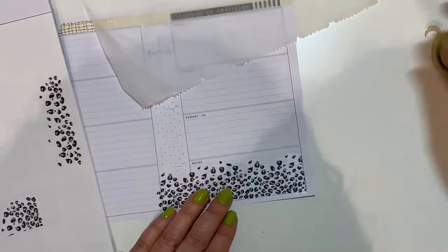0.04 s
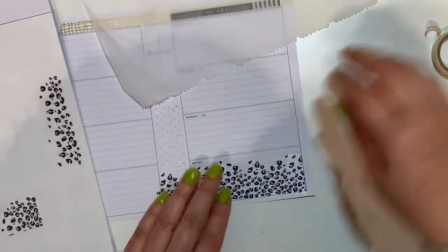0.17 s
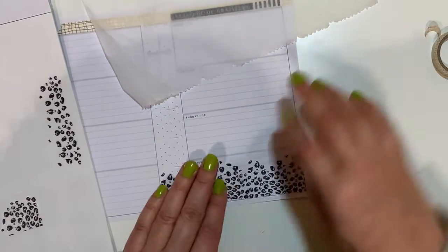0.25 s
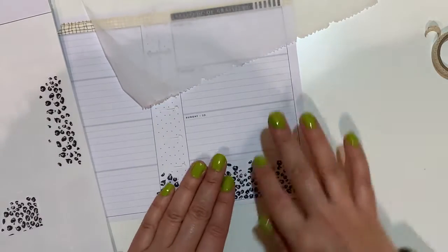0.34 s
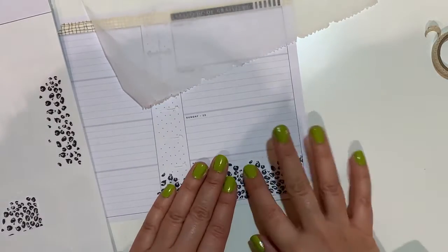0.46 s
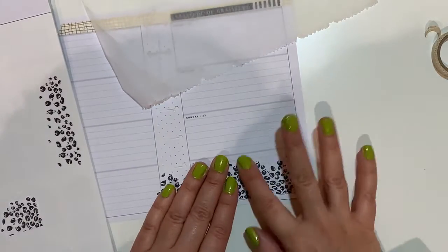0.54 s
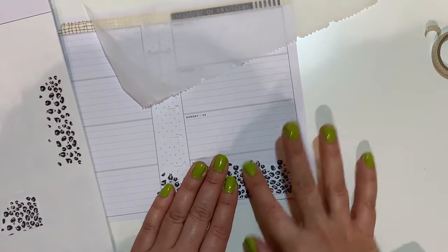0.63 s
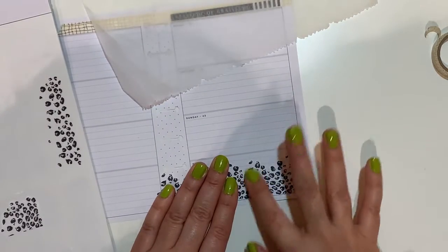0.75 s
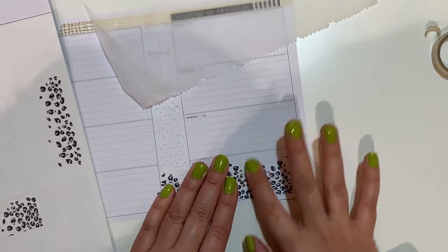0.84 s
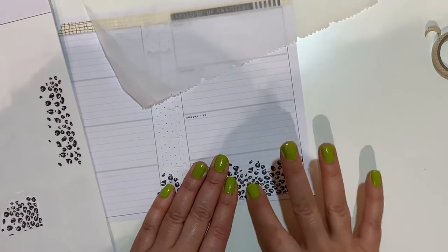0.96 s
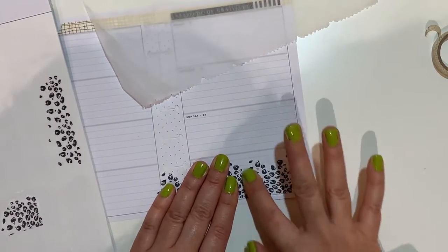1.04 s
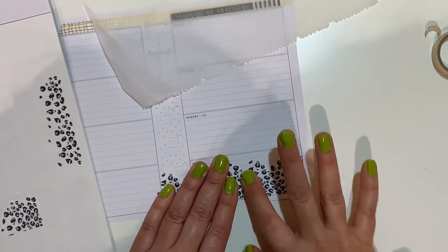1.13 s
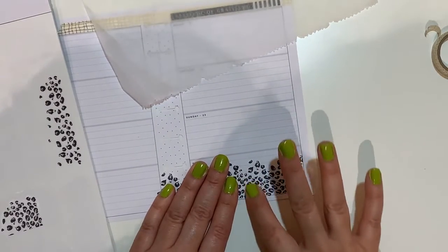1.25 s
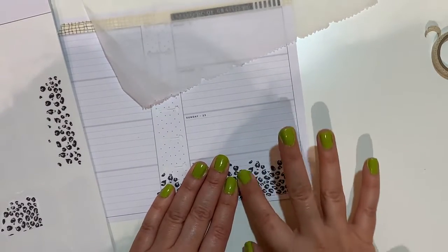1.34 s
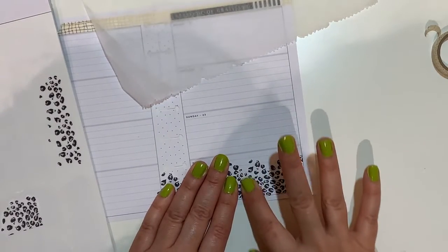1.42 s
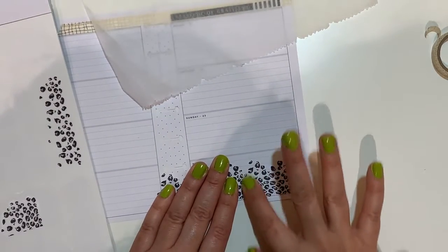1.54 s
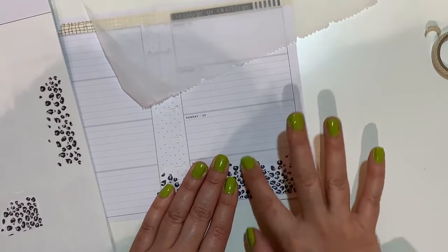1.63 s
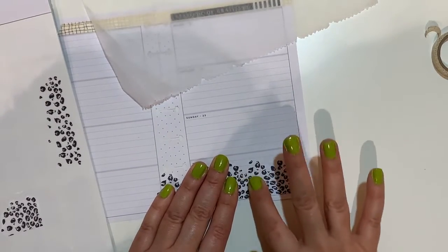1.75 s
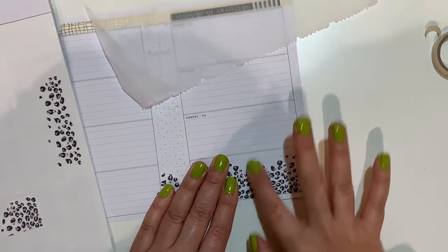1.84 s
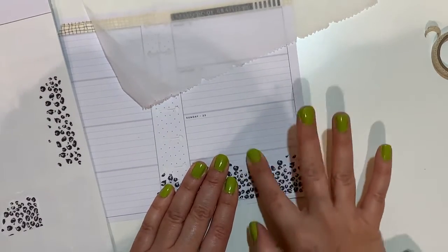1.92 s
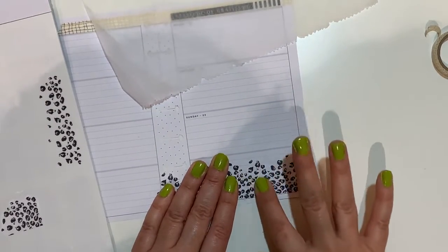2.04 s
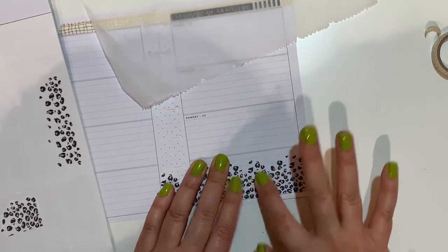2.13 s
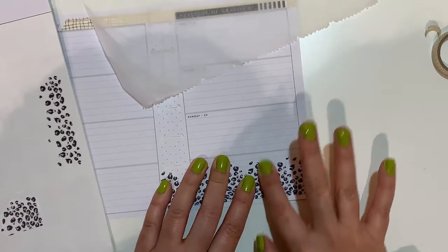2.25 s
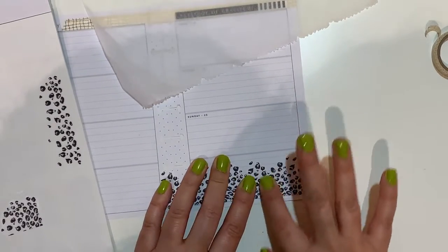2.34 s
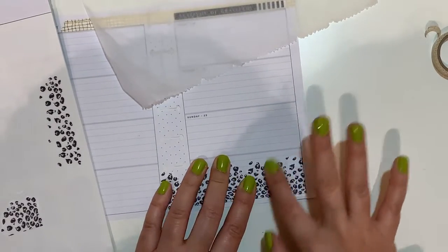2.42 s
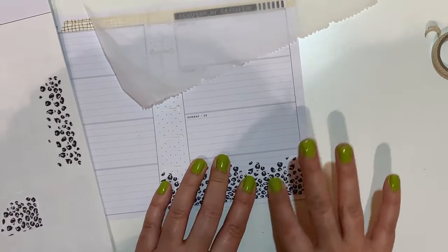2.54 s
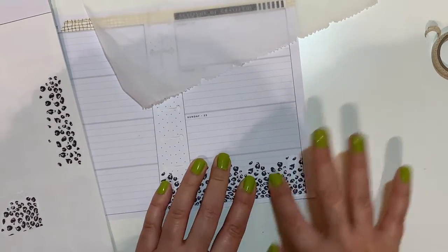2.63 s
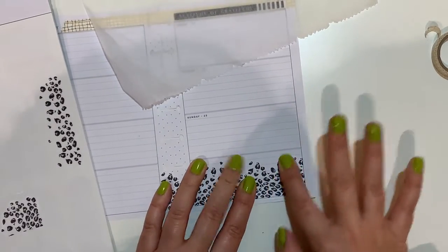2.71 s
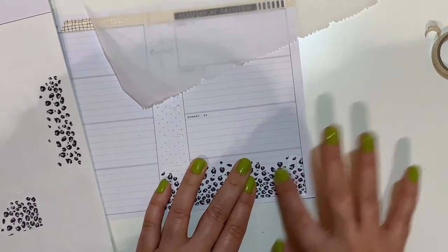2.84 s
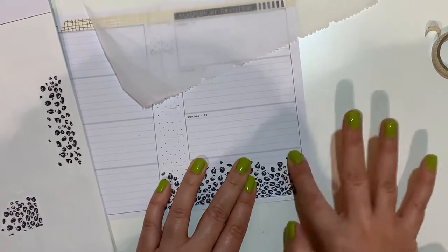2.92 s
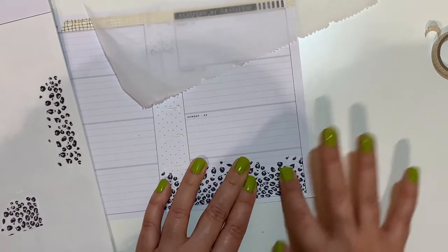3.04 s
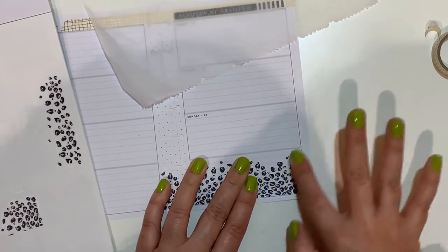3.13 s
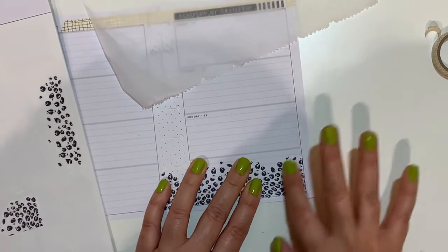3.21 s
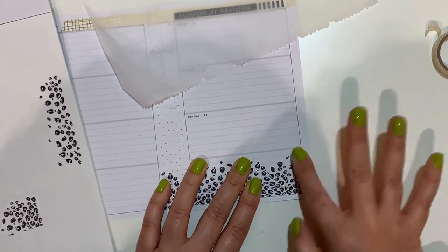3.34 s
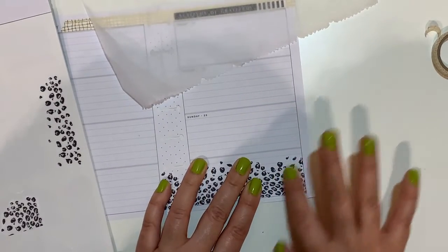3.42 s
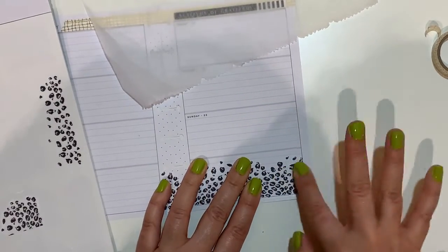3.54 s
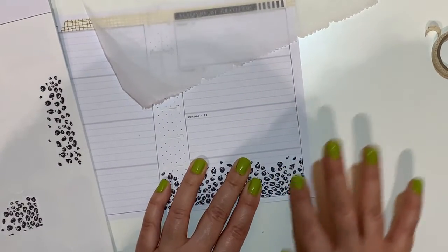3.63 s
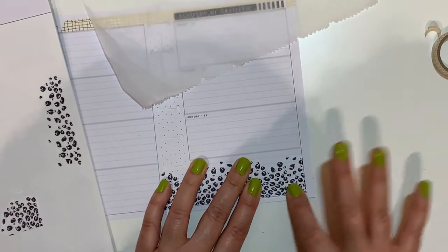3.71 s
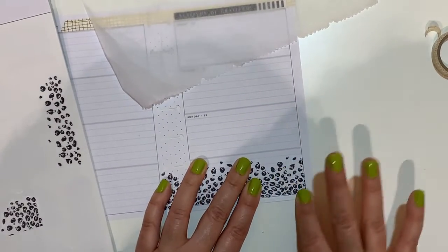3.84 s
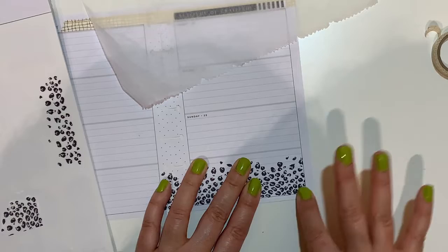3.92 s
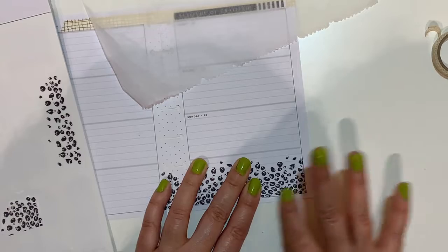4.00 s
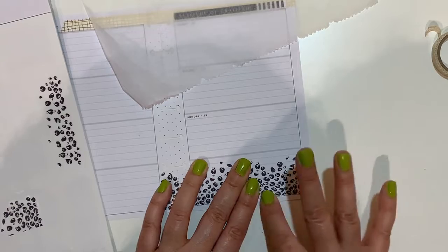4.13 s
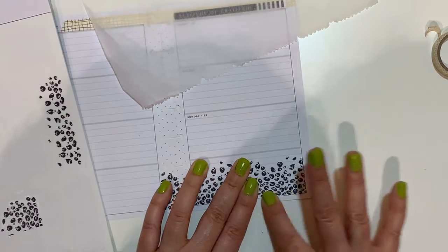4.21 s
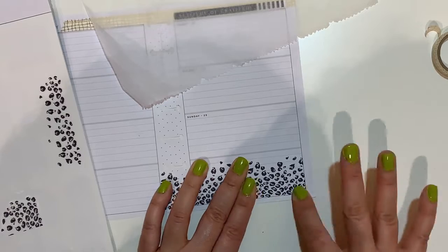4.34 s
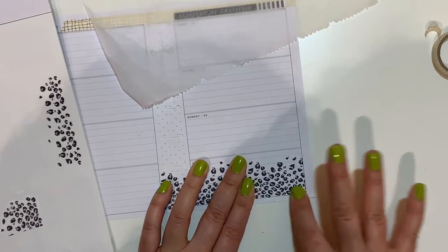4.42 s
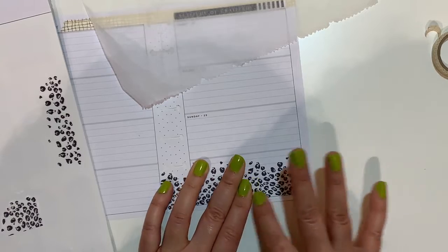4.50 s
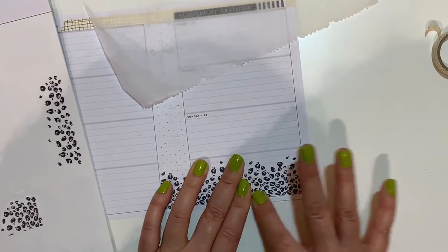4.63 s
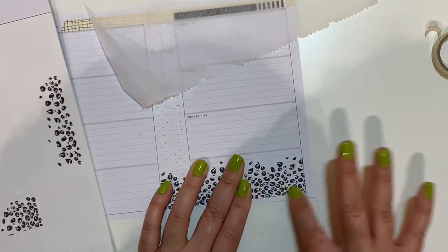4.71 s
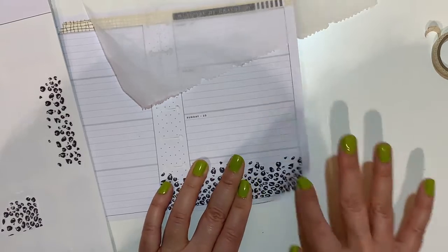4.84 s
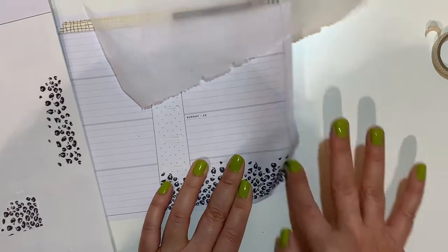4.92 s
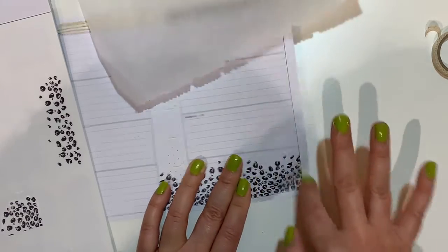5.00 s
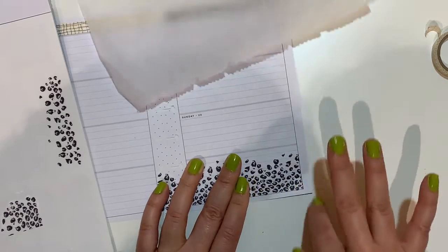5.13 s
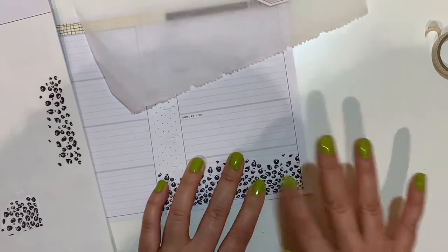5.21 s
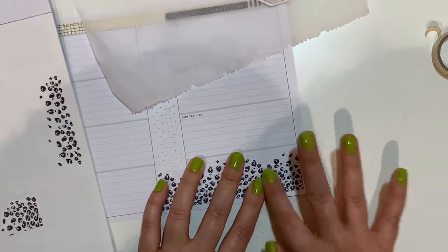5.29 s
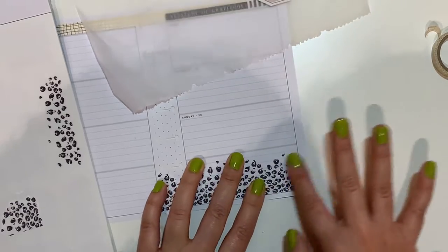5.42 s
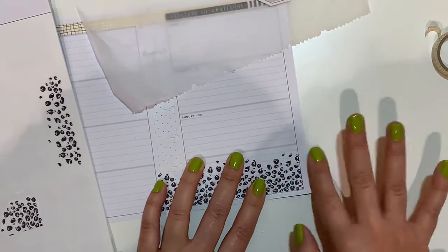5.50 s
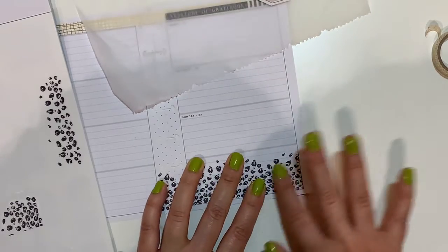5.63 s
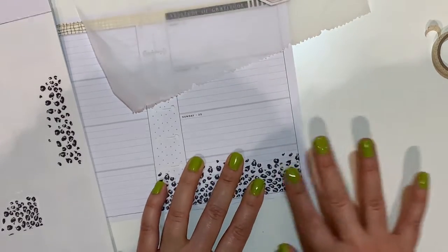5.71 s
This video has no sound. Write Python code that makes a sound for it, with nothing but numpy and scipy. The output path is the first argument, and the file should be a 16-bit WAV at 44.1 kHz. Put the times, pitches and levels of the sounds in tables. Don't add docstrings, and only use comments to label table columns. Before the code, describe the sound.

Fingertips rub a paper sticker flat on a page with quick soft papery strokes and dull desk thuds, then a sharp crackling corner flick and heavy slaps.

```python
import sys
import numpy as np
from scipy import signal
from scipy.fft import rfft, irfft
from scipy.io import wavfile

SR = 44100
rng = np.random.default_rng(int(sys.argv[2]) if len(sys.argv) > 2 else 0)


def log_audio(samples):
    frames = np.atleast_2d(samples).T
    limited = np.clip(frames, -1, 1)
    pcm = np.round(limited * 32767).astype(np.int16)
    wavfile.write(sys.argv[1], SR, pcm)


def invert_db(level):
    return 10 ** (np.asarray(level, dtype=float) / 20)


N = 253971

# (start [s], length [s], skin hiss [dB])
RUBS = [(0.504, 0.081, -68.5), (0.609, 0.089, -61.5), (0.743, 0.088, -63), (0.845, 0.11, -63),
        (1.01, 0.073, -69.5), (1.127, 0.097, -68), (1.276, 0.086, -69.5), (1.408, 0.079, -67.5),
        (1.542, 0.1, -65), (1.683, 0.095, -66), (1.826, 0.096, -65.5), (1.968, 0.11, -63),
        (2.126, 0.088, -64), (2.239, 0.094, -61.5), (2.388, 0.08, -65), (2.496, 0.089, -65),
        (2.627, 0.099, -65.5), (2.74, 0.084, -65), (2.862, 0.075, -65.5), (2.972, 0.075, -65),
        (3.089, 0.095, -67), (3.203, 0.052, -65.5), (3.309, 0.057, -67.5), (3.392, 0.085, -64),
        (3.522, 0.05, -66), (3.596, 0.094, -66)]
# (start [s], length [s], skin hiss [dB], paper rustle [dB])
SWEEPS = [(0.162, 0.021, -79, -76), (0.35, 0.067, -87, -75.5), (0.395, 0.04, -77, -75.5),
          (0.41, 0.2, -82.5, -72), (3.743, 0.049, -68.5, -72.5), (3.822, 0.074, -76.5, -73.5),
          (4.007, 0.097, -65.5, -74), (4.259, 0.1, -66, -69.5), (4.452, 0.11, -64.5, -75.5),
          (4.643, 0.16, -65.5, -70), (5.18, 0.067, -76, -78), (5.248, 0.011, -65.5, -70),
          (5.297, 0.034, -66.5, -70.5), (5.362, 0.13, -61.5, -76.5), (5.457, 0.1, -72, -73),
          (5.632, 0.069, -80, -77.5), (5.696, 0.12, -63, -72)]
# (start [s], length [s], dull drag [dB], grit [dB])
DRAGS = [(0.174, 0.12, -53, -55), (0.589, 0.092, -61.5, -59), (0.677, 0.15, -53.5, -62.5),
         (1.095, 0.12, -53, -55), (1.659, 0.11, -54, -54), (1.755, 0.15, -58.5, -80),
         (1.973, 0.047, -56, -52.5), (2.193, 0.11, -57, -50.5), (2.243, 0.063, -56, -53.5),
         (2.504, 0.098, -69.5, -77), (2.7, 0.087, -60, -87), (2.851, 0.16, -58.5, -57),
         (3.117, 0.096, -74, -60), (3.394, 0.023, -57.5, -55.5), (3.948, 0.065, -69.5, -76),
         (4.011, 0.02, -61, -89), (4.305, 0.023, -62, -88), (4.367, 0.15, -79, -93),
         (4.556, 0.062, -64.5, -67), (4.95, 0.097, -62, -44), (5.098, 0.089, -56.5, -85),
         (5.244, 0.072, -60, -82), (5.434, 0.088, -81, -56.5), (5.613, 0.092, -51, -68)]
# (frequency [Hz], density [dB per Hz])
HISS = [(4500, -10), (6000, -5.5), (7100, -2), (7700, -3), (8500, 3), (10300, 2.5), (11800, 6),
        (13500, 0.5), (15900, 2)]
# (frequency [Hz], density [dB per Hz])
RIDGE_PEAK = [(10000, -20), (11200, -14.5), (12200, -11), (13600, -14)]
# (frequency [Hz], density [dB per Hz])
RUSTLE = [(700, -13), (1000, -7), (1250, -10), (1500, -6), (1900, -10), (2400, -3), (2900, 0), (3450, -9),
          (3900, -3), (4600, -5), (5100, -12), (5550, -9), (6300, -15), (8000, -20)]
# (frequency [Hz], density [dB per Hz])
SHEET = [(1200, -20), (1500, 5.5), (1900, -22), (2400, 2), (2950, 3.5), (3500, -3.5), (4000, 1),
         (4700, -16), (5600, -3.5)]
# (frequency [Hz], density [dB per Hz])
DRAG_COLOUR = [(150, 5), (230, 9), (340, 6.5), (480, 9.5), (650, 1.5), (800, -8), (980, -3), (1300, -8.5)]
# (frequency [Hz], density [dB per Hz])
GRIT = [(900, -17), (1300, -29), (2000, -18), (2600, -18), (3500, -17.5), (4300, -27), (4900, -25.5),
        (6000, -34)]
# (time [s], paper [dB], skin hiss [dB])
FLICK = [
    (4.82, -88, -110),
    (4.862, -54, -46),
    (4.928, -44, -45),
    (4.99, -42.5, -56.5),
    (5.016, -53.5, -44),
    (5.048, -54, -54),
    (5.085, -66.5, -98),
    (5.24, -85, -89),
    (5.27, -80, -87),
]
# (frequency [Hz], density [dB per Hz])
FLICK_COLOUR = [(300, -44), (450, -0.5), (780, -1), (970, 3.5), (1350, -11), (1940, 10.5), (2330, 8.5),
                (4000, 4.5), (7000, -5), (10000, -5)]
# (time [s], thud [dB], knock [dB])
LANDINGS = [(1.008, -41.5, -51.5), (1.274, -38, -42.5), (1.535, -38.5, -42.5), (1.82, -38, -43),
            (2.125, -38, -43.5), (2.391, -42, -48), (2.623, -41, -46), (2.861, -40, -53), (3.085, -42, -47),
            (3.3, -47.5, -53), (3.518, -46, -55.5), (3.744, -46, -57.5), (3.989, -42, -42)]
LANDING_PHASES = (0.3, 2.5, 5.0)
# (time [s], peak [dB], pitch [Hz])
TURNS = [(0.725, -50, 83), (0.76, -43.5, 99), (0.854, -52, 107), (0.88, -45.5, 88), (1.115, -46.5, 92),
         (1.159, -46.5, 88), (1.176, -49.5, 90), (1.384, -51, 86), (1.421, -48.5, 94), (1.671, -46.5, 93),
         (1.712, -45.5, 95.6), (1.763, -56, 108), (1.939, -45.5, 97), (1.985, -47, 88), (2.008, -52, 68.6),
         (2.232, -41, 88), (2.257, -52, 88), (2.306, -49, 103), (2.486, -49, 85), (2.509, -53.5, 78.5),
         (2.538, -56, 70), (2.722, -48.5, 81), (2.764, -53, 101), (2.99, -49.5, 103), (3.127, -49, 81),
         (3.163, -49, 88), (3.219, -57, 91), (3.418, -55.5, 104.5)]
# (time [s], peak [dB], pitch [Hz])
LEANS = [(0.216, -62, 78.5), (0.422, -43, 89.3), (0.457, -57.5, 66.6), (0.492, -60, 74), (0.648, -59, 85.5),
         (3.715, -53.5, 75), (3.909, -52, 94), (4.161, -59, 89), (4.275, -50.5, 91), (4.32, -53, 93),
         (4.404, -53, 98), (1.499, -73, 216), (1.6, -68.5, 242), (1.641, -65, 257), (2.601, -68, 198),
         (2.669, -66, 220), (4.43, -65.5, 219), (4.467, -56, 91), (4.556, -53, 84), (4.587, -55.5, 60.5),
         (4.658, -50, 96), (4.855, -51.5, 98.4), (5.004, -47.5, 93), (5.06, -55.5, 97), (5.129, -63, 114),
         (5.164, -57, 91), (5.243, -49, 91), (5.27, -33.5, 100), (5.318, -32, 96.4), (5.379, -57, 108),
         (5.662, -26.5, 100.3), (5.715, -40.5, 85.5)]
# (frequency [Hz], level [dB], t60 [s])
HUM_MODES = [(650, -2.5, 0.032), (926, -5, 0.048), (1000, -3.5, 0.026), (1260, -5.5, 0.012),
             (1500, -11.5, 0.01)]
# (time [s], peak [dB], brightness [dB])
TAPS = [(0.171, -64, 8), (0.184, -52, -18), (0.202, -50, -9), (0.234, -51.5, -7), (0.614, -54, 4),
        (0.622, -52, 1), (0.827, -52.5, 0), (1.031, -58, -6), (1.096, -54.5, -10), (1.107, -54.5, 5.5),
        (1.206, -54, -10), (1.375, -59, -4.5), (1.433, -60.5, 2.5), (1.593, -68, 10), (1.668, -68, 12),
        (1.899, -57.5, 4), (1.97, -62, 4), (1.981, -51.5, -5), (2.203, -56.5, 8), (2.254, -60, 2),
        (2.502, -65, 6), (2.511, -55.5, 2), (3.387, -71, -3), (3.399, -58, -12), (4.306, -63, -19),
        (4.46, -64.5, -3), (3.927, -59, -6), (4.11, -68.5, 6.5), (3.109, -66, -3), (2.213, -64, 4),
        (4.563, -61, -6.5), (4.844, -61, -22), (5.2569, -52, -19), (5.293, -52, -26), (5.612, -63.5, 3),
        (5.687, -48.5, -8)]
# (frequency [Hz], level [dB], t60 [s])
TOP_MODES = [(198.6, 3.5, 0.066), (316, -9, 0.11), (405, -8, 0.069), (588, -4, 0.016), (630, -1, 0.047),
             (716, -7, 0.033), (957, 1, 0.035), (1059, -8, 0.047), (1220, -57, 0.18), (1504, 1.5, 0.0089)]
# (frequency [Hz], level [dB], t60 [s])
BRIGHT_MODES = [(1830, -3, 0.012), (2260, 2.5, 0.0045), (2470, 4, 0.0044), (3770, -17, 0.019)]
# (time [s], slip rate [slips per s])
CHATTER = [
    (2.8108, 172),
    (2.83, 160),
    (2.852, 138),
]
# (level [dB], ..)
CHATTER_DB = (-55, -50, -46)
# (time [s], peak [dB])
SLIPS = [(2.858, -41.5), (2.87, -44), (2.884, -34), (2.902, -36.5), (2.923, -39), (2.936, -40),
         (2.949, -55), (2.952, -41), (2.956, -42), (2.974, -49), (3.016, -44.5), (3.074, -48.5),
         (3.087, -51.5), (3.107, -44.5), (3.129, -44.5), (3.15, -46), (3.167, -49), (3.2013, -63)]
# (frequency [Hz], level [dB], t60 [s])
SLIP_MODES = [(418, -14, 0.031), (643, -3.5, 0.036), (720, -21, 0.017), (952, 1, 0.028), (1020, -13, 0.01),
              (1210, -6, 0.018), (1430, -7, 0.012), (1710, -4, 0.011), (2130, -4, 0.008),
              (2263, -4.5, 0.013), (2550, -4.5, 0.0091), (3280, -14, 0.0087), (3830, -12.5, 0.009)]
# (time [s], peak [dB], centre [Hz], top end [dB])
SNAPS = [(0.1682, -46, 2130, -29), (0.1855, -34.5, 540, -45), (0.2, -35.5, 560, -45),
         (0.234, -60, 484, -45), (4.854, -37, 5640, -12), (4.9303, -27.5, 2300, -13),
         (4.9377, -44, 2310, -6), (4.9494, -22, 2450, -20), (4.9598, -33, 2270, -9),
         (4.9694, -30, 3630, 9.5), (4.976, -48, 2150, -17), (4.9847, -26, 1220, -1), (5, -33, 2360, 1),
         (5.0954, -40, 1830, -28), (5.1286, -46, 2400, -26), (5.1455, -38, 2500, -21),
         (5.1485, -43.5, 3700, -26), (5.156, -52, 2200, -26), (5.205, -44, 2620, -26),
         (5.1783, -37.5, 3440, -23), (5.221, -35, 3570, -22), (5.2559, -30.5, 5250, -4.5),
         (5.613, -40.5, 537, -45), (5.642, -43.5, 1440, 10.5)]
# (time [s], peak [dB], centre [Hz], top end [dB])
TICKS = [
    (0.17, -42.5, 7900, -27),
    (0.16, -57, 2900, -20),
    (0.36, -65, 9800, 17),
    (0.889, -49, 3100, -15),
    (0.42, -54, 7950, 7.5),
]
# (time [s], peak [dB])
CLICKS = [(0.057, -65), (0.139, -65), (0.264, -62), (0.341, -63), (0.465, -62), (0.54, -61), (0.66, -63),
          (0.733, -63), (0.85, -60), (0.889, -60), (0.917, -59)]
# (frequency [Hz], level [dB], t60 [s])
NAIL_MODES = [(560, 2, 0.014), (985, 6.5, 0.016), (1460, 5.5, 0.013), (2120, 6, 0.016), (2380, 1, 0.0099),
              (3000, -12, 0.0055)]
# (start [s], length [s], level [dB])
TREMORS = [
    (0.127, 0.18, -65.5),
    (0.37, 4.2, -70.5),
    (4.824, 0.7, -73.5),
    (5.578, 0.2, -63.5),
]
# (frequency [Hz], density [dB per Hz])
TREMOR = [(40, 7), (60, -7.5), (95, -2), (150, -8)]
# (frequency [Hz], density [dB per Hz])
ROOM = [(40, -9), (95, -13), (180, -21), (440, -24.5), (900, -33.5), (1500, -28), (2600, -34.5),
        (6500, -43), (12000, -37), (15700, -52)]
# (frequency [Hz], side minus mid [dB])
WIDTH = [(60, -10), (150, -27), (380, -8), (950, -2), (2380, -2), (4000, -3), (7500, 0), (10500, -28),
         (15000, -9)]
# (frequency [Hz], left over right [dB], lead of right [rad])
PORTS = [(120, 0.9, 0), (400, 0.4, 0.1), (1500, 0, 0.2), (2200, -2.5, 2.0), (3000, -2.5, 2.1),
         (3900, -1, 0.2), (5500, 1.5, 0.5), (9500, 1, 0.3), (11000, 0, 0.35), (15700, -0.5, 1.45)]


def rubbing():
    hiss, rustle = slides(strokes(), attack=5.5, release=3.6, edge_db=11, lead=1.0)
    dull, gritty = slides(drags(), attack=9.6, release=1.18, edge_db=11.0, lead=1.0)
    flick_db, flick_hiss_db = in_time(FLICK)
    sweeping = np.arange(N) > 3.7 * SR

    skin = (hiss + invert_db(flick_hiss_db)) * friction(HISS, patchy_db=1.5, flicker_hz=23.3, grain_db=1.4, count=7)
    ridges = friction(RIDGE_PEAK, patchy_db=2, flicker_hz=25, grain_db=1.5, count=12)
    skin += hiss * np.sqrt(hiss / invert_db(-67.0)) * ridges * np.where(sweeping, invert_db(-1.0), 1)

    paper = rustle * friction(RUSTLE, patchy_db=2.5, flicker_hz=6, grain_db=1.2, count=7)
    drag = invert_db(-4.5) * dull * friction(DRAG_COLOUR, patchy_db=1.2, flicker_hz=40, grain_db=2, count=1.5)
    grit = invert_db(-11.5) * gritty * friction(GRIT, patchy_db=1.5, flicker_hz=30, grain_db=1.5, count=4)

    flick = invert_db(flick_db) * friction(FLICK_COLOUR, patchy_db=0.5, flicker_hz=41, grain_db=-4.0)
    flick = flick + crackle(invert_db(flick_db), side_db=-13.0)

    sung = sum(invert_db(db - 37) * ring(paper + grit, hz, t60) for hz, db, t60 in TOP_MODES + BRIGHT_MODES)
    sheet = friction(SHEET, patchy_db=-3.0, flicker_hz=45, grain_db=1.0, count=7)
    sheet = invert_db(0.5) * sweeping * rustle * sheet
    return skin + paper + drag + grit + flick + sung + sheet


def strokes():
    rustle_db = (-74, -71)
    rubs = [(s, length, 0.55, db, rustle_db[k % 2]) for k, (s, length, db) in enumerate(RUBS)]
    return rubs + [(s, length, 0.39, *dbs) for s, length, *dbs in SWEEPS]


def drags():
    skids = [(s - .008, 0.056, db - 28.5, db - 28) for s, db, _ in LANDINGS]
    return [(s, length, 0.31, *dbs) for s, length, *dbs in DRAGS + skids]


def slides(rows, attack, release, edge_db, lead):
    t, levels = np.arange(N) / SR, np.zeros((2, N))
    for start, length, rise, *tops_db in rows:
        near = slice(max(int((start - .1) * SR), 0), int((start + length + .15) * SR))
        for level, top_db, share in zip(levels, tops_db, (rise, lead * rise)):
            share = np.clip(share, .05, .95)
            off_top = (t[near] - start) / length - share
            catching = np.clip(-off_top / share, 0, 9) ** attack
            slowing = np.clip(off_top / (1 - share), 0, 9) ** release
            level[near] += invert_db(top_db - edge_db * (catching + slowing))
    return levels


def crackle(level, side_db):
    per_s, cycles = 820, 23
    sizes = invert_db(4.5 * np.minimum(rng.exponential(1, N), 4)) * rng.choice([-1, 1], (2, N))
    born = rng.random(N) < per_s * invert_db(5 * drift(30)) / SR
    pitches = np.geomspace(900, 6500, 16)
    dealt = rng.integers(0, 16, N)
    rings = sum(ring(sizes * born * (dealt == k), hz, cycles / hz) for k, hz in enumerate(pitches))
    return spread(invert_db(-12.5) * level * rms_one(rings), side_db)


def thuds(rise_s, early_pitch, settle_s, sway_hz, sway_db, side_db):
    out, t = np.zeros(N + SR), np.arange(SR // 5) / SR
    rows = pushes()
    phases = rng.uniform(0, 2 * np.pi, len(rows))
    phases[-3 * len(LANDINGS):] = np.tile(LANDING_PHASES, len(LANDINGS))

    swell = (t / rise_s * np.exp(1 - t / rise_s)) ** 4.02
    ring_on = (1 - np.exp(-(t / rise_s) ** 2)) * np.exp(-t / 0.044)
    swell = swell + invert_db(-29) * ring_on
    bent = t + early_pitch * settle_s * (1 - np.exp(-t / settle_s))
    since_top = t - rise_s
    for (s, peak_db, hz), phase in zip(rows, phases):
        wave = np.sin(1.9 * np.pi * hz * (bent - rise_s - early_pitch * settle_s) + phase)
        wave += invert_db(sway_db) * np.sin(2 * np.pi * sway_hz * since_top + phase)
        wave += invert_db(-20) * np.sin(2 * np.pi * 181.5 * since_top + 2 * phase)
        at = max(round((s - rise_s) * SR), 0)
        out[at:at + len(t)] += invert_db(peak_db) * swell * wave
    return np.array([out[:N], invert_db(side_db) * np.roll(out, 60)[:N]])


def pushes():
    # (delay [s], level [dB], pitch [Hz])
    steps = [(-0.0244, -13, 88), (0.0179, 0, 98.2), (0.075, -15, 72)]
    landings = [(s + later, db + step_db, hz) for s, db, _ in LANDINGS for later, step_db, hz in steps]
    return TURNS + LEANS + landings


def knocks(contact_s, side_db):
    landings = [(s, db, -25) for s, _, db in LANDINGS]
    s, peak_db, bright_db = np.transpose(TAPS + landings)
    low = strike(s, TOP_MODES, peak_db - 8.0, contact_s=0.0014, rough=0.4, spread_db=1.0)
    high = strike(s, BRIGHT_MODES, peak_db + bright_db - 1.0, contact_s, rough=0.84, spread_db=7.0)
    return spread(low + high, side_db)


def hum(side_db):
    rows = [(s + 0.01, 0.08, .3, db - 33, db - 33) for s, db, _ in LANDINGS]
    level = slides(rows, attack=7.6, release=2.0, edge_db=3.5, lead=1)[0]
    drag = level * invert_db(4.9 * drift(91)) * rng.standard_normal((2, N))
    hummed = sum(invert_db(db) * ring(drag, hz, t60) for hz, db, t60 in HUM_MODES) / 10
    return spread(hummed, side_db)


def chatter(slip_db, side_db):
    per_s, level_db = in_time([(s, rate, db) for (s, rate), db in zip(CHATTER, CHATTER_DB)])
    count = np.floor(np.cumsum(np.maximum(per_s, 0)) / SR + .95)
    quick = np.flatnonzero(np.diff(count, prepend=0))
    s, peak_db = np.transpose(SLIPS)
    out = strike(quick / SR, SLIP_MODES, level_db[quick] - 4.0, contact_s=0.00086, rough=0.37, spread_db=2.5)
    out += strike(s, SLIP_MODES, peak_db + slip_db, contact_s=0.0028, rough=0.54, spread_db=2.5)
    return spread(out, side_db)


def snaps(cycles, top_t60, side_db):
    out, t = np.zeros((2, N + SR)), np.arange(SR // 20) / SR
    events = SNAPS + TICKS
    noise = rng.standard_normal((len(events), 2, len(t)))
    bright = bandpass(noise, 7000, 16000)
    body = bandpass(noise, 1500, 6000)
    for k, (s, peak_db, hz, top_db) in enumerate(events):
        crease = noise[k] * np.exp(-t / .0012) / 6
        pop = ring(crease, hz, cycles / hz)
        pop = pop / np.abs(pop).max(axis=1, keepdims=True)
        crack = 0.051 * body[k] * invert_db(-60 * t / 0.054)
        tick = invert_db(top_db) * bright[k] * invert_db(-60 * t / top_t60)
        at = round(s * SR)
        out[:, at:at + len(t)] += invert_db(peak_db - 10.0) * (pop + crack + tick)
    return spread(out[:, :N], side_db)


def clicks(click_db, side_db):
    s, peak_db = np.transpose(CLICKS)
    out = strike(s, NAIL_MODES, peak_db + click_db, contact_s=0.0011, rough=1.0, spread_db=4.0)
    return spread(out, side_db)


def tremor():
    rows = [(s, length, .5, db, db) for s, length, db in TREMORS]
    level = slides(rows, attack=40, release=40, edge_db=10, lead=1)[0]
    return level * friction(TREMOR, patchy_db=2.0, flicker_hz=13.0, grain_db=0.2, count=2)


def room(near):
    t60_s, wet_db = 0.18, -9.5
    t = np.arange(SR // 3) / SR
    tails = rng.standard_normal((2, len(t))) * invert_db(-60 * t / t60_s) * (t > .002)
    tails = signal.lfilter([1], [1, -.35], tails)
    tails /= np.sqrt(np.sum(tails ** 2, axis=1, keepdims=True))
    return invert_db(wet_db) * signal.fftconvolve(near[:1], tails, axes=1)[:, :N]


def room_air():
    return invert_db(-74) * friction(ROOM, patchy_db=1.5, flicker_hz=4, grain_db=.3, count=2)


def friction(spectrum, patchy_db, flicker_hz, grain_db, count=2.5):
    low_hz, high_hz = spectrum[0][0], min(spectrum[-1][0], 17000)
    edges = np.geomspace(low_hz, high_hz, int(count * np.log2(high_hz / low_hz)) + 2)
    grain = invert_db(grain_db * drift(118))
    white = rng.standard_normal((2, 2, N)) * grain
    out, together = 0, drift(flicker_hz)
    for k, (low, high) in enumerate(zip(edges, edges[1:])):
        hz = np.sqrt(low * high)
        band = bandpass(white[k % 2], low, high)
        gain = invert_db(at_hz(spectrum, hz) + patchy_db * (.5 * together + drift(flicker_hz)))
        out = out + spread(gain * band, at_hz(WIDTH, hz))
    return out / np.sqrt(np.mean(out[0] ** 2))


def strike(s, modes, level_db, contact_s, rough, spread_db):
    at, out = np.round(np.asarray(s) * SR).astype(int), np.zeros((2, N))
    fade = np.exp(-1 / (contact_s * SR))
    for k, (hz, mode_db, t60) in enumerate(modes):
        pad = np.zeros((2, N))
        pad[:, at] = invert_db(level_db + mode_db + spread_db * rng.standard_normal((len(at), 2)).T)
        press = signal.lfilter([1 - fade], [1, -fade], pad + 1e-18)
        turning = fade * np.exp(2j * np.pi * hz / SR)
        swing = 2 * signal.lfilter([1 - fade], [1, -turning], pad + 1e-18).real * (-1) ** k
        grit = press * rough * np.sqrt(contact_s * SR) * rng.standard_normal((2, N))
        out += ring(swing + grit, hz, t60)
    return out


def ring(clicks, hz, t60):
    r, w = invert_db(-60 / (t60 * SR)), 2 * np.pi * hz / SR
    return signal.lfilter([0, np.sin(w)], [1, -2 * r * np.cos(w), r * r], clicks + 1e-18)


def drift(rate):
    r = np.exp(-80 * np.pi * rate / SR)
    slow = signal.lfilter([1], [1, -2 * r, r * r], rng.standard_normal(N // 40 + 2002))[2000:]
    return np.interp(np.arange(N) / 40, np.arange(len(slow)), rms_one(slow))


def bandpass(x, low_hz, high_hz):
    return signal.sosfilt(signal.butter(2, [low_hz, high_hz], "band", fs=SR, output="sos"), x)


def spread(x, side_db):
    return x * [[1], [invert_db(side_db)]]


def rms_one(x):
    return x / np.sqrt(np.mean(x ** 2) + 1e-20)


def in_time(rows):
    s, *columns = np.transpose(rows)
    return [np.interp(np.arange(N) / SR, s, c, left=-140, right=-140) for c in columns]


def at_hz(points, hz):
    point_hz, db = np.transpose(points)
    return np.interp(np.log(hz), np.log(point_hz), db)


def ports(x):
    hz = np.fft.rfftfreq(N, 1 / SR)
    at, level_db, lead = np.transpose(PORTS)
    turn = invert_db(np.interp(hz, at, level_db) / 2) * np.exp(-.5j * np.interp(hz, at, lead))
    return irfft(rfft(x) * [turn, 1 / turn], N)


def scene():
    air = room_air()
    rocking = thuds(rise_s=0.021, early_pitch=2.19, settle_s=0.0064, sway_hz=53.0, sway_db=-7.5, side_db=-23.0)
    near = rubbing() + knocks(contact_s=0.003, side_db=-9.5) + clicks(click_db=-7.0, side_db=-1.5)
    near = near + chatter(slip_db=-7.0, side_db=-15) + hum(side_db=-6.5)
    near = near + snaps(cycles=12, top_t60=0.01, side_db=-5)
    mid, side = near + room(near) + rocking + air + tremor()
    return np.array([mid + side, mid - side])


def low_pass(x):
    return signal.sosfilt(signal.butter(12, 16480, fs=SR, output="sos"), x)


def record(dry):
    low_cut = signal.butter(2, 46.6, "high", fs=SR, output="sos")
    heard = signal.sosfilt(low_cut, ports(dry))
    return low_pass(heard)


dry = scene()
out = record(dry)
log_audio(out)
```